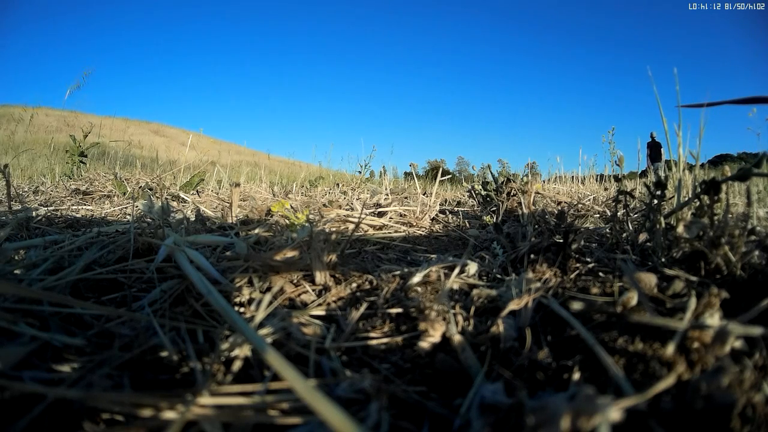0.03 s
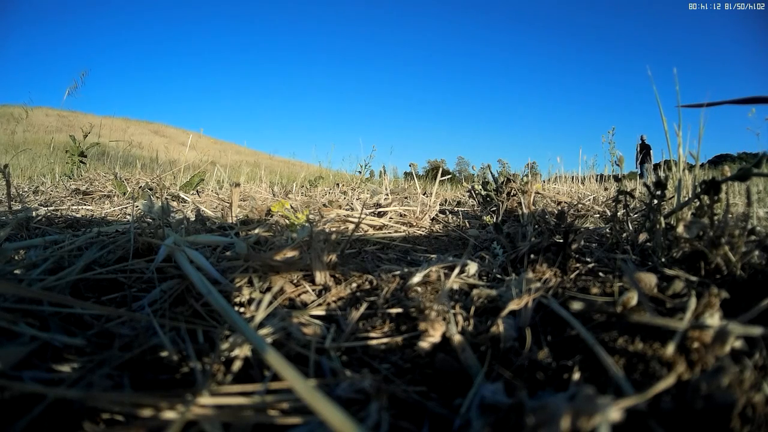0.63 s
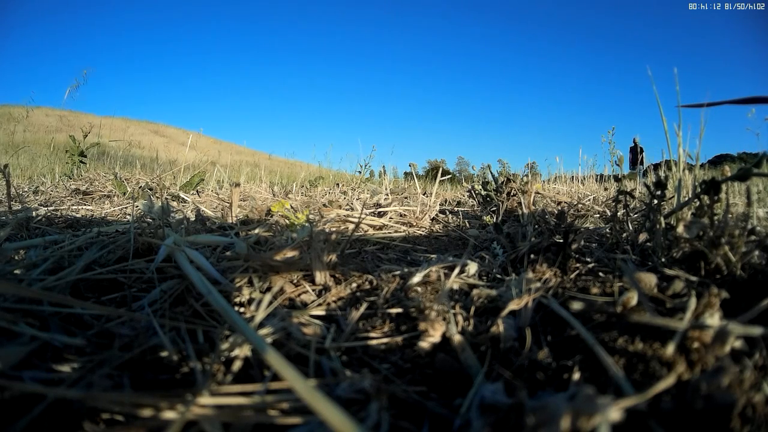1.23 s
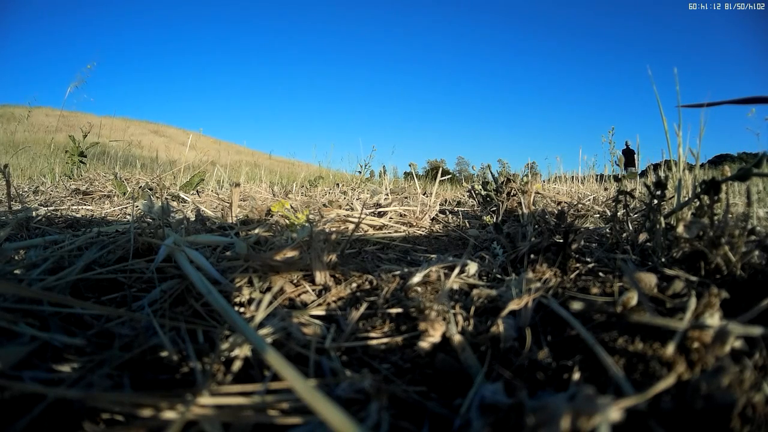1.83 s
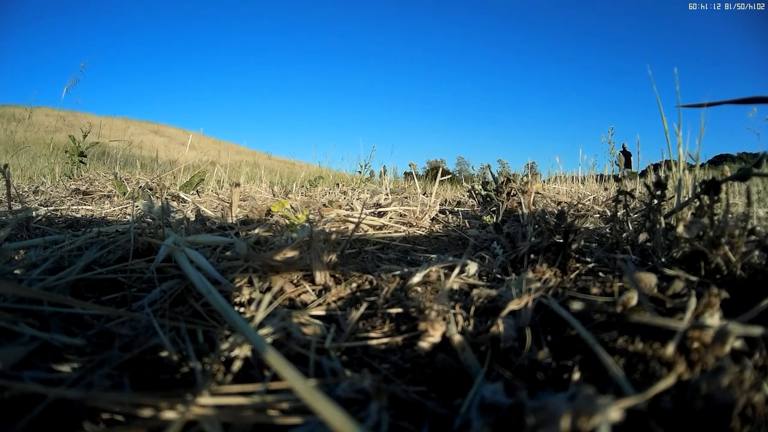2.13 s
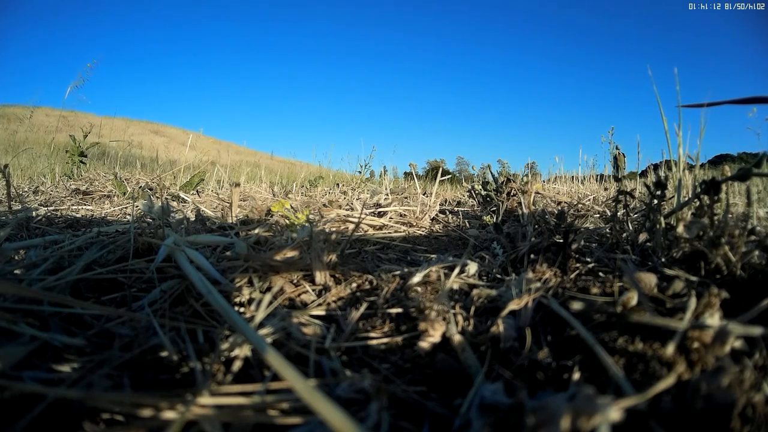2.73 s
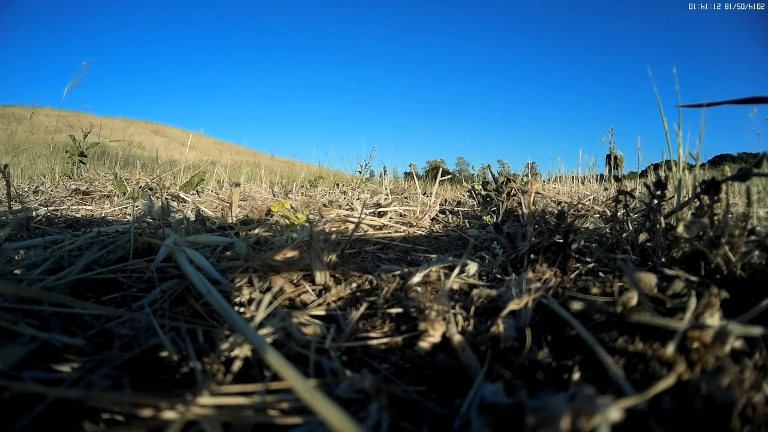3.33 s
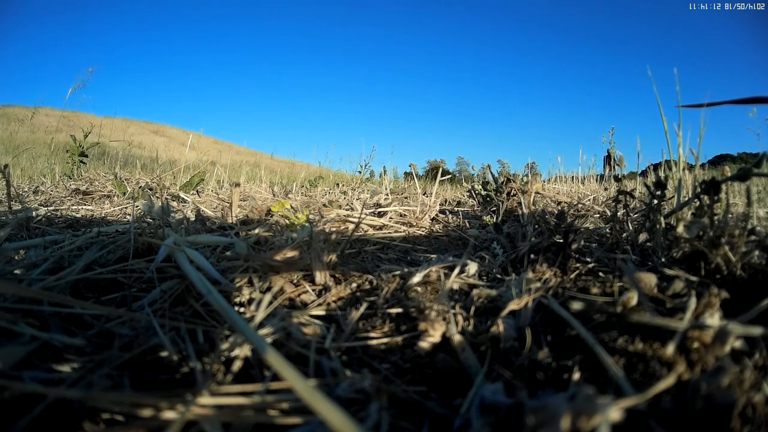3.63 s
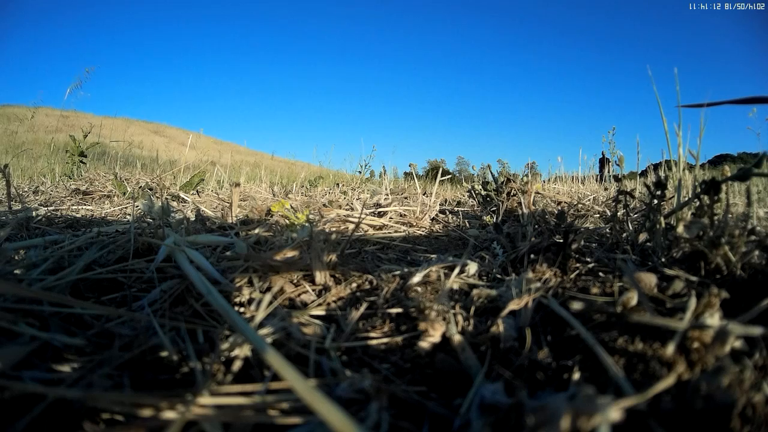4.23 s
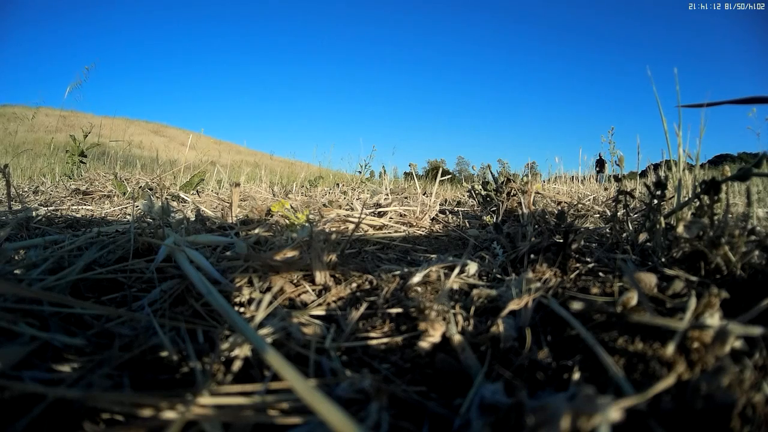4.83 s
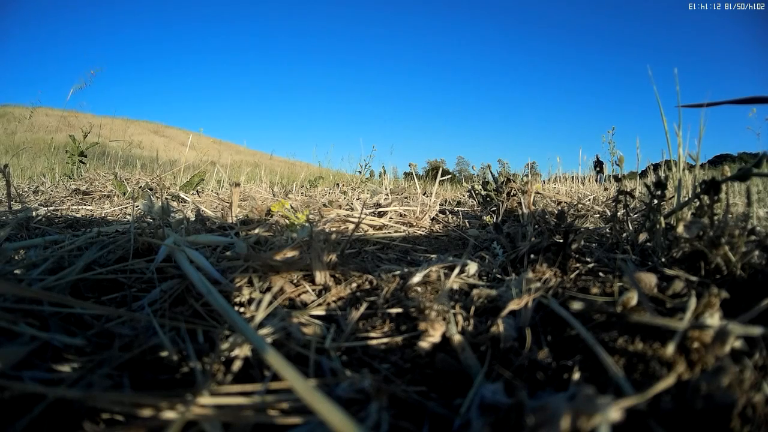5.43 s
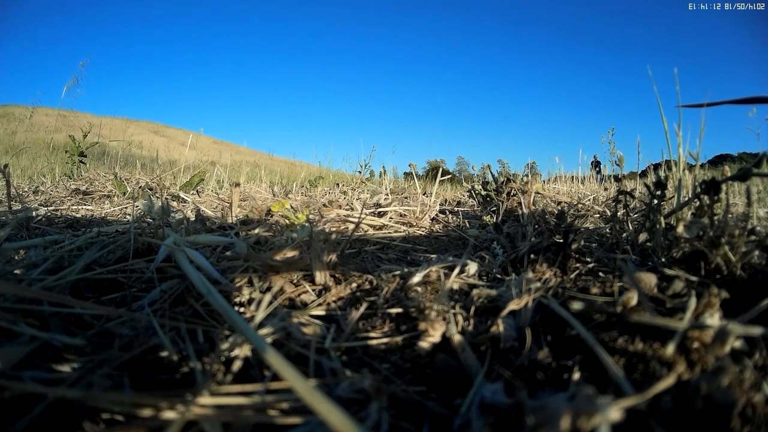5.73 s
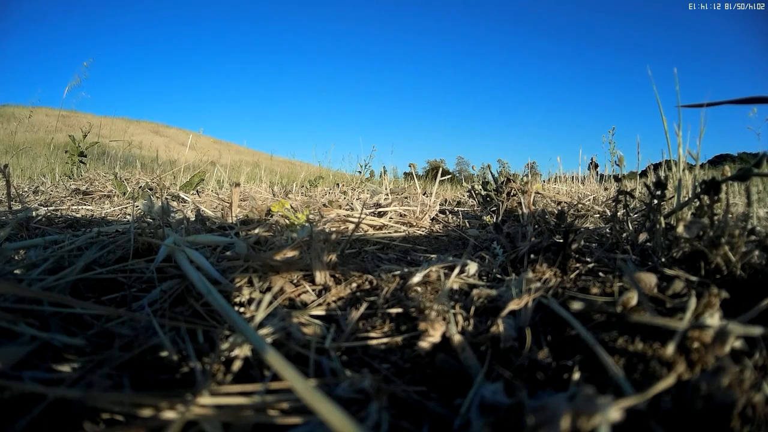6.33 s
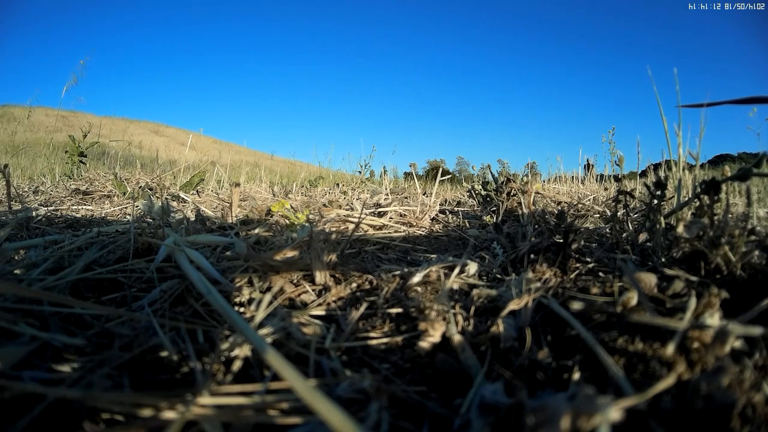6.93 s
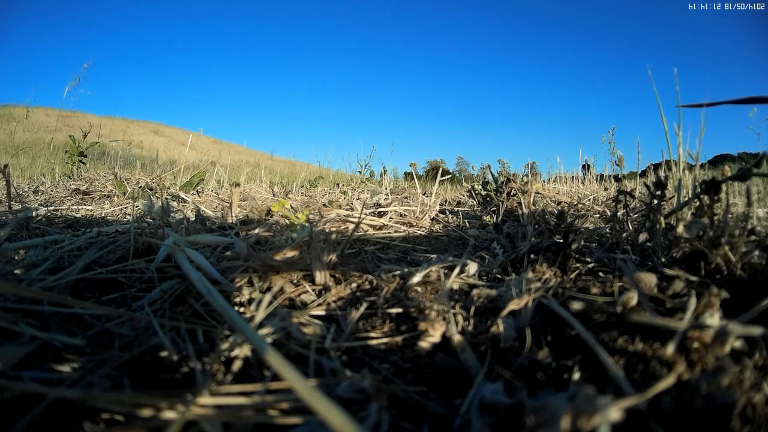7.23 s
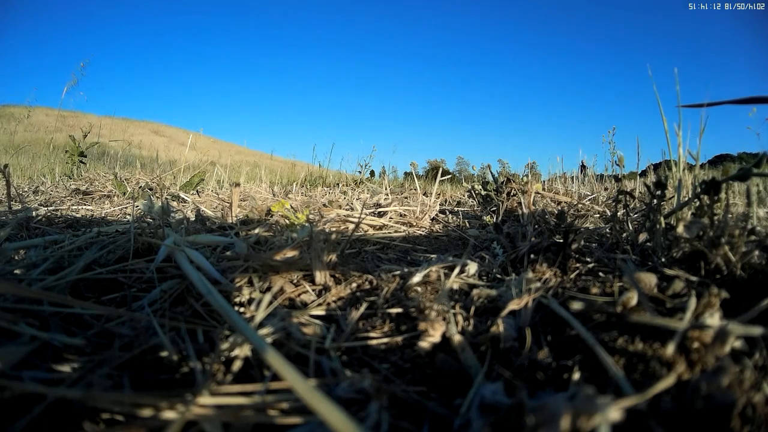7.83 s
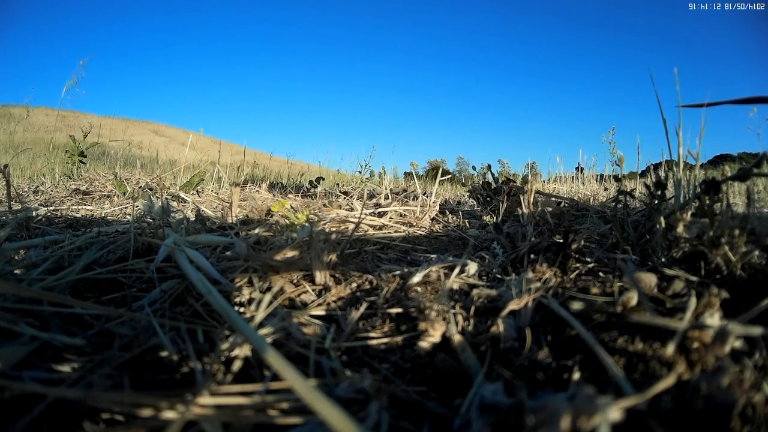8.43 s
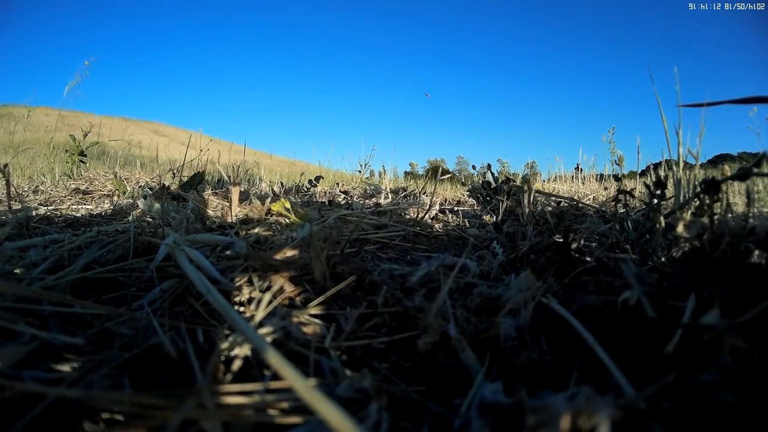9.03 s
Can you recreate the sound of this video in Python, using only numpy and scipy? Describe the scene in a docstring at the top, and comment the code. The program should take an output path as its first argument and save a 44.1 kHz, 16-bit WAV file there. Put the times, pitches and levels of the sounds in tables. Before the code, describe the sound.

A steady electronic whine with low wind gusts and distant chirps, until running steps come near, thudding and snapping dry stalks.

```python
"""An open hillside, one camera microphone lying in dry grass. From the start gusts rumble over its port,
while the camera's own circuit buzzes and, once a second, hisses. Far off, a bird chirps in phrases and
another whistles faintly, until about 6 s. Then a runner comes up the slope of the field: heel and sole
thud on packed soil and legs swish through the straw. From about 8 s the steps are close by the
microphone, crunching earth and snapping stalks."""
import sys
import numpy as np
from scipy import signal
from scipy.fft import rfft, irfft, next_fast_len
from scipy.io import wavfile
from scipy.ndimage import uniform_filter1d

SR = 44100
rng = np.random.default_rng(int(sys.argv[2]) if len(sys.argv) > 2 else 0)


def generate_wav(signal):
    """Clip the signal to [-1, 1] and save it as 16-bit WAV at the path in sys.argv[1]."""
    frames = np.transpose(np.atleast_2d(signal))
    scaled = np.clip(frames, -1, 1) * 32767
    pcm = np.round(scaled).astype(np.int16)
    wavfile.write(sys.argv[1], SR, pcm)


N = 405719
TIME = np.arange(N) / SR
HEEL_LEAD_S = 0.032  # the heel lands this long before the sole

# Running steps nearing the microphone: sole lands t/s, thud/dB, earth/dB, stalks/dB, blades/dB
FOOTFALLS = [(6.175, -52.5, -61, -71, -71), (6.338, -56, -60, -64, -72), (6.592, -52, -60, -78, -74),
             (7.055, -49.5, -58, -74, -85), (7.478, -52.5, -46, -69, -78), (7.903, -40.5, -37, -48, -73),
             (8.306, -37, -26.5, -33.5, -54), (8.7, -33, -36, -34.5, -48),
             (9.141, -57, -36.5, -36.5, -49.5)]
# Spectrum of dry grass blades crackling: f/Hz, level/dB
BLADE_SPECTRUM = [(1000, 1), (2600, 0.5), (3700, -2), (4300, 1), (5200, 4.5), (5700, 9.5), (6250, 0),
                  (7500, 2.5), (8400, -2.5), (9600, 2.5), (10550, -4), (12000, 3), (13300, -9),
                  (15500, -10)]


def undb(db):
    """Decibels to gain."""
    return 10 ** (np.asarray(db) / 20)


def unit(x):
    """Scale to rms 1."""
    return x / np.sqrt(np.mean(x ** 2))


def noise():
    """White noise."""
    return rng.standard_normal(N)


def walk(rate):
    """Random levels held 1 / rate s and smoothed twice; rms 1."""
    hold = int(SR / rate)
    held = np.repeat(rng.standard_normal(N // hold + 1), hold)
    return unit(uniform_filter1d(uniform_filter1d(held, hold), hold)[:N])


def curve(points):
    """Gain along a curve of (t/s, level/dB) points."""
    return undb(np.interp(TIME, *np.transpose(points)))


def swell(peak, rise, fall, shape=1.27):
    """Power of a push that builds and dies away: exponentially at shape 1, like a bell curve at 2."""
    near = slice(max(int((peak - 4 * rise) * SR), 0), int((peak + 8 * fall) * SR))
    dt, power = TIME[near] - peak, np.zeros(N)
    power[near] = np.exp(-np.where(dt < 0, (dt / rise) ** 2, np.abs(dt / fall) ** shape))
    return power


def ring(x, gain_at, size=8192):
    """Causal filter with the given gain against frequency, built from the cepstrum; output rms 1."""
    cepstrum = irfft(np.log(gain_at(np.fft.rfftfreq(size, 1 / SR))))
    cepstrum[1:size // 2] *= 2
    cepstrum[size // 2 + 1:] = 0
    impulse = irfft(np.exp(rfft(cepstrum)))
    return unit(signal.fftconvolve(x, impulse)[:N])


def colour(x, points):
    """Filter by a spectrum of (f/Hz, level/dB) points that rolls off above the last."""
    hz, db = np.transpose(points)
    return ring(x, lambda f: undb(np.interp(np.log(f + 1), np.log(hz), db)) / (1 + (f / hz[-1] / 2) ** 2))


def resonate(x, peaks):
    """Filter by steep-sided resonances of (f/Hz, width/Hz, level/dB)."""
    def gain_at(f):
        return np.sqrt(sum(undb(db) ** 2 / (1 + ((f - hz) / width) ** 2) ** 4 for hz, width, db in peaks))
    return ring(x, gain_at)


def air(level_db=-58, sway_db=0.94):
    """Open air over the hillside and the microphone's own hiss, swaying slightly."""
    spectrum = [(25, -2), (100, -2.5), (250, -9.5), (500, -13), (1000, -16.5), (1500, -19), (2300, -30),
                (4000, -26.5), (5000, -28.5), (7000, -30.5), (10000, -29), (15000, -31)]  # steady background: f/Hz, level/dB
    return colour(noise(), spectrum) * undb(level_db + sway_db * walk(3.145))


def wind(buffet_db=-1, flutter_db=3.0, fall_share=0.69, deep_stretch=0.9, fall_shape=1.26):
    """Large eddies rumble and buffet the microphone port; small, brighter ones flutter in strong gusts."""
    breeze = [(0, -48.5), (.7, -57), (1.7, -69), (2.5, -59.5), (2.8, -49.5), (4.4, -48.5), (4.7, -61),
              (5.4, -60), (6.0, -51.5), (6.5, -66.5), (6.9, -61), (7.5, -54.5), (8.4, -62), (9.2, -55)]  # wind between gusts: t/s, level/dB
    # Gusts on the port: peak t/s, half length/s, buffeting/dB, deep rumble/dB, small eddies/dB
    gusts = [(0.135, 0.019, -33.5, -42, -51.5), (0.219, 0.026, -38.5, -38.5, -45),
             (0.293, 0.016, -38.5, -47, -48), (.55, 0.027, -46, -48, -58), (2.6, 0.018, -43, -38, -66),
             (2.723, 0.042, -39.5, -38, -44.5), (2.804, 0.11, -40.5, -45, -46.5),
             (3.01, 0.019, -34, -47, -50), (3.35, 0.093, -45.5, -45, -57), (3.514, 0.044, -40, -36.5, -45),
             (3.621, 0.039, -34.5, -46, -43.5), (3.93, 0.062, -41, -50, -46), (4.055, 0.037, -36, -44, -46),
             (4.28, 0.038, -47, -47.5, -62), (4.432, 0.024, -42, -45, -45),
             (4.525, 0.044, -35.5, -45, -46.5), (4.876, 0.042, -50, -42.5, -54),
             (5.155, 0.047, -62, -50, -70), (5.615, 0.046, -47.5, -42.5, -54),
             (5.73, 0.036, -53, -50.5, -62), (5.974, 0.064, -51, -66, -60.5),
             (7.608, 0.035, -40.5, -36, -51), (7.787, 0.067, -32.5, -46, -51),
             (7.927, 0.072, -43, -42.5, -66), (9.16, .04, -49.5, -47.5, -61)]
    # Spectra of the eddies, largest to smallest: f/Hz, level/dB
    rumble_spectrum = [(12, -11.5), (33, -1), (55, -0.5), (80, -7), (140, -32.5), (500, -67)]
    buffet_spectrum = [(35, -18.5), (70, -1.5), (102, 3.5), (145, -7.5), (220, -23), (450, -30.5),
                       (1500, -64.5)]
    flutter_spectrum = [(80, -7.5), (180, 2.5), (280, -5.5), (450, -15.5), (800, -24.5), (2500, -39.5)]
    deep, buffet, small = (undb([0, -5, -12])[:, None] * curve(breeze)) ** 2
    for s, half, gust_db, deep_db, small_db in gusts:
        puff = swell(s, half, half * fall_share, fall_shape)
        buffet += undb(gust_db) ** 2 * puff
        small += undb(small_db) ** 2 * puff
        deep_half = half * deep_stretch
        deep += undb(deep_db) ** 2 * swell(s, deep_half, deep_half * fall_share, fall_shape)
    return (colour(noise(), rumble_spectrum) * np.sqrt(deep)
            + colour(noise(), buffet_spectrum) * np.sqrt(buffet) * undb(buffet_db)
            + colour(noise(), flutter_spectrum) * np.sqrt(small) * undb(flutter_db * walk(30)))


def circuit_buzz(pulse_hz=79.658, pause_s=.055, scatter_db=0.7, restart_db=1):
    """Inside the camera, clock-steady current pulses ring the circuit, pausing about once a second."""
    runs = [(.0097, -53, -0.5), (0.4953, -54.5, -1.5), (1.5464, -56, 0.5), (2.598, -53, 0),
            (3.662, -52.5, 0), (4.7134, -55.5, 1), (5.7648, -54, -1.5), (6.8163, -58, 7), (7.869, -53, 1),
            (8.9331, -56, 3)]  # unbroken runs of pulses: start t/s, level/dB, drift/(dB/s)
    resonances = [(158.8, 45, -60), (509, 117, -70.5), (950, 230, -83), (1229, 102.6, -64),
                  (1482, 139, -73.5), (1847, 85, -74), (2185, 177, -82.5), (2440, 104, -86),
                  (3090, 250, -81.5), (3485, 31, -68.5), (3567, 247, -72), (3852, 160, -64),
                  (4700, 58, -97), (4794, 174, -80), (5324, 100, -85), (5900, 370, -85), (6600, 490, -93.5)]  # rung by each pulse: f/Hz, width/Hz, level/dB
    pulses, taps = np.zeros(N + SR), np.arange(-8, 9)
    stops = [run[0] - pause_s for run in runs[1:]] + [N / SR]
    for (start, start_db, drift), stop in zip(runs, stops):
        age = np.arange(0, stop - start, 1 / pulse_hz)
        at = (start + age)[:, None] * SR
        index = at.astype(int) + taps  # a windowed sinc places each pulse between samples
        db = start_db + drift * age + scatter_db * rng.standard_normal(len(at))
        db[0] += restart_db
        pulses[index] += undb(db)[:, None] * np.sinc(index - at) * np.hanning(len(taps))
    pulse_size = np.sqrt(np.sum(pulses ** 2) * SR / N / pulse_hz)
    return resonate(pulses, resonances) * pulse_size


def circuit_hiss(first_s=.168, every_s=1.0, length_s=0.333, level_db=-70, sway_db=-0.9):
    """A thin hiss from the camera's circuit, switched on and off by its clock."""
    peaks = [(8850, 550, -9), (9480, 450, -2.5), (10500, 350, -6), (11100, 300, -3), (11480, 350, -1.5),
             (12250, 380, -4.5), (14300, 1200, -11)]  # treble bands of the hiss: f/Hz, width/Hz, level/dB
    on = (TIME - first_s) % every_s < length_s
    return on * undb(level_db + sway_db * walk(1)) * resonate(noise(), peaks)


def chirping_bird(every_s=.31, half_s=0.064, top_hz=4980, arch_hz=270, trill_rate=75, trill_hz=130):
    """A far bird repeats a short arch of pitch with a fast trill, blurred by distance."""
    phrases = [(.29, 1.88), (2.41, 3.35), (3.83, 4.72), (5.37, 6.01)]  # runs of chirps: first t/s, last t/s
    carry = [(.6, -64), (.95, -71), (2.4, -71), (2.7, -64), (3.85, -67), (4.1, -63), (4.75, -70),
             (5.7, -64.5)]  # how well the chirps carry to the microphone: t/s, level/dB
    out, waver_hz = np.zeros(N), 90 * walk(600)
    for first, last in phrases:
        for s in np.linspace(first, last, round((last - first) / every_s) + 1):
            near = slice(int((s - half_s) * SR), int((s + half_s) * SR))
            along = (TIME[near] - s) / half_s
            trill = trill_hz * np.sin(2 * np.pi * trill_rate * TIME[near])
            hz = top_hz - arch_hz * along ** 2 + trill + waver_hz[near]
            out[near] += np.cos(along * np.pi / 2) * np.sin(2 * np.pi * np.cumsum(hz) / SR)
    return out * curve(carry) * undb(-2)


def whistling_bird(waver=0.03):
    """A second far bird's gliding whistles, roughened on their way through the moving air."""
    whistles = [(0.818, 0.23, 3200, 3030, -76), (.93, .04, 4900, 3950, -68), (1.07, .07, 4200, 4260, -73),
                (1.44, .06, 4700, 4600, -73), (3.46, 0.1, 4680, 4580, -71), (4.27, .05, 3450, 2900, -67),
                (5.185, 0.043, 3000, 2440, -72), (5.38, 0.043, 2950, 2650, -74),
                (5.489, 0.072, 3000, 3650, -67), (5.577, 0.044, 3500, 2650, -67),
                (5.615, 0.04, 2800, 3530, -63)]  # single notes: t/s, length/s, start f/Hz, end f/Hz, level/dB
    out, wobble = np.zeros(N), 1 + waver * walk(400)
    for s, length, start_hz, end_hz, db in whistles:
        i, n = int(s * SR), int(length * SR)
        hz = np.linspace(start_hz, end_hz, n) * wobble[i:i + n]
        out[i:i + n] += undb(db) * np.sqrt(2 * np.hanning(n)) * np.sin(2 * np.pi * np.cumsum(hz) / SR)
    return out


def stalk_snaps(cycles=0.45, splinter_s=0.0019, splinter_db=-6, size=1024):
    """A breaking stalk swings out and back for a cycle or two and sheds a spray of splinters."""
    snaps = [(1.018, -47, 8500, -4), (7.116, -47, 5000, 2), (7.863, -28, 690, -16), (7.9, -24, 740, -34),
             (8.188, -30.5, 5530, 3.5), (8.234, -25, 9000, -2), (8.264, -18, 1000, -15),
             (8.3481, -9.5, 640, -14.5), (8.357, -20.5, 3180, -5), (8.3731, -8.5, 980, -27),
             (8.408, -21.5, 1230, -28), (8.608, -34, 4500, -2), (8.695, -16, 915, -12),
             (8.708, -22.5, 900, -1), (8.829, -28.5, 1470, 4.5), (8.844, -27, 1220, -22),
             (8.934, -41, 5500, 0), (8.988, -19, 1000, -21), (9.051, -22, 1500, -11),
             (9.109, -26.5, 1390, 0), (9.137, -15.5, 1070, -21), (9.176, -17, 1270, -9.5)]  # single stalks breaking: t/s, level/dB, ring f/Hz, relative spray/dB
    out, t, spray = np.zeros(N + size), TIME[:size], colour(noise(), BLADE_SPECTRUM)
    for s, db, hz, spray_db in snaps:
        i, age = min(int(s * SR), N - size), t * hz / cycles
        body = np.sin(2 * np.pi * hz * t) * age ** 2 * np.exp(2 - 2 * age)
        splinters = undb(spray_db + splinter_db) * spray[i:i + size] * np.exp(-t / splinter_s)
        out[i:i + size] += undb(db) * (body + splinters)
    return out[:N]


def fractures(per_s, spread_db):
    """Tiny random fractures, per_s a second in each band, mostly weak and a few strong."""
    edges = [0, 700, 1300, 2600, 4500, 6700, 8500, 10800, 22050]  # limits of bands that crackle independently: f/Hz
    size = next_fast_len(N, True)
    hz, spectrum = np.fft.rfftfreq(size, 1 / SR), 0
    for low, high in zip(edges, edges[1:]):
        when, strength, side = rng.random((per_s * N // SR, 3)).T
        force = undb(spread_db * np.minimum(-np.log(1 - strength), 4.5)) * np.sign(side - .5)
        clicks = np.bincount((when * N).astype(int), force, size)
        spectrum = spectrum + rfft(clicks) * ((hz >= low) & (hz < high))
    return irfft(spectrum)[:N]


def step_crunch(rise_s=0.0091, fall_s=0.014, heel_db=-6.5, swish_earth_db=-3, swish_fall_share=0.73):
    """Heel, then sole, crush earth, break stalks and brush blades; the legs swish between steps."""
    rustle = [(5.8, -79), (7.0, -78), (7.4, -69), (7.75, -64), (8.1, -64), (8.42, -54.5), (8.53, -66.5),
              (8.8, -51), (8.9, -69.5), (8.96, -59.5), (9.2, -60)]  # grass stirring as the runner nears: t/s, level/dB
    swishes = [(7.11, 0.028, -60, -70), (7.3, 0.033, -65, -72), (7.73, 0.012, -68, -56),
               (7.872, 0.011, -46.5, -53.5), (8.2, 0.025, -45, -46), (8.288, 0.031, -34.5, -38),
               (8.351, 0.024, -34, -45), (8.65, 0.036, -53.5, -53), (8.788, 0.03, -42, -53.5),
               (9.016, 0.016, -39.5, -50.5), (9.081, 0.037, -40, -49.5), (9.177, 0.013, -37.5, -50)]  # legs sweeping the straw: peak t/s, half length/s, stalks/dB, blades/dB
    # Spectra of crushed earth and breaking stalks: f/Hz, level/dB
    earth_spectrum = [(40, -50), (120, -14), (320, -5), (520, 0), (850, -1.5), (1300, -7.5), (2000, -22.5),
                      (4000, -33)]
    stalk_spectrum = [(400, -54), (900, -1.5), (1400, 5.5), (1800, 1), (2200, -10.5), (2900, -14.5),
                      (3700, -3.5), (4400, -13), (9000, -55)]
    power = (undb([5, 2, 0])[:, None] * curve(rustle)) ** 2  # rows: earth, stalks, blades
    for s, _, *layer_dbs in FOOTFALLS:
        heel = undb(heel_db) ** 2 * swell(s - HEEL_LEAD_S, rise_s, fall_s / 2)
        sole = swell(s, rise_s, fall_s)
        power += undb(layer_dbs)[:, None] ** 2 * (heel + sole)
    for s, half, stalks_db, blades_db in swishes:
        sweep = swell(s, half, half * swish_fall_share)
        power += undb([stalks_db + swish_earth_db, stalks_db, blades_db])[:, None] ** 2 * sweep
    earth, stalks, blades = np.sqrt(power)
    return (earth * colour(fractures(per_s=2500, spread_db=4.0), earth_spectrum)
            + stalks * colour(fractures(per_s=1100, spread_db=4.0), stalk_spectrum)
            + blades * undb(1) * colour(fractures(per_s=4500, spread_db=5.5), BLADE_SPECTRUM))


def step_thuds(rise_s=0.0047, fall_s=.012, trim_db=-1):
    """Packed soil gives a dull, short thud under the heel and another under the sole."""
    soil_spectrum = [(60, -16.5), (170, -7.5), (330, 2), (520, -4), (800, -10), (1500, -34)]  # struck soil: f/Hz, level/dB
    power = np.zeros(N)
    for s, db, *_ in FOOTFALLS:
        heel, sole = swell(s - HEEL_LEAD_S, rise_s, fall_s), swell(s, rise_s, fall_s)
        power += undb(db + trim_db) ** 2 * (heel + sole)
    return np.sqrt(power) * colour(noise(), soil_spectrum)


def scene():
    """Everything as it reaches the one microphone in the grass."""
    background = circuit_buzz() + circuit_hiss() + wind() + air()
    runner = step_thuds() + step_crunch() + stalk_snaps()
    far_birds = chirping_bird() + whistling_bird()
    return (background + runner + far_birds)[None]


def record(dry, top_hz=15800):
    """The camera cuts the top of the treble steeply."""
    return signal.sosfilt(signal.ellip(10, .2, 70, top_hz, fs=SR, output="sos"), dry)


dry = scene()
out = record(dry)
generate_wav(out)
```